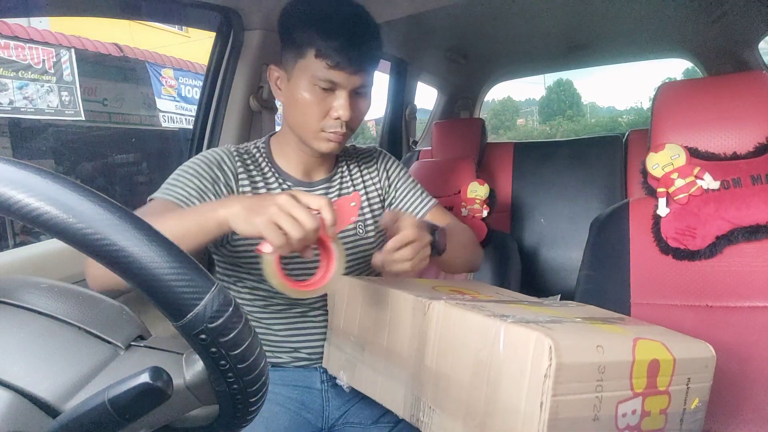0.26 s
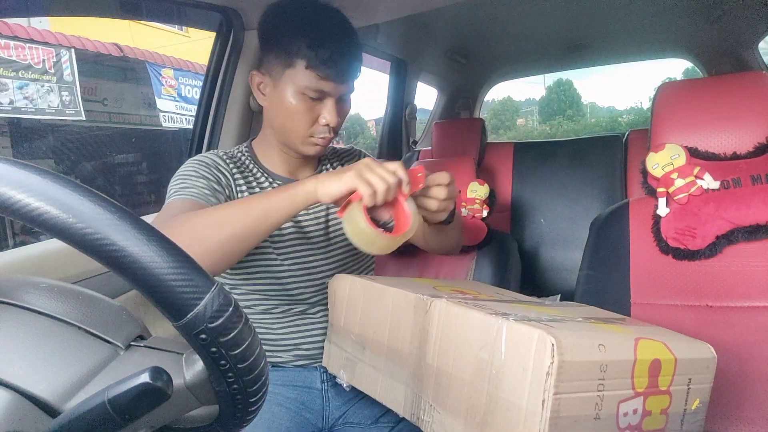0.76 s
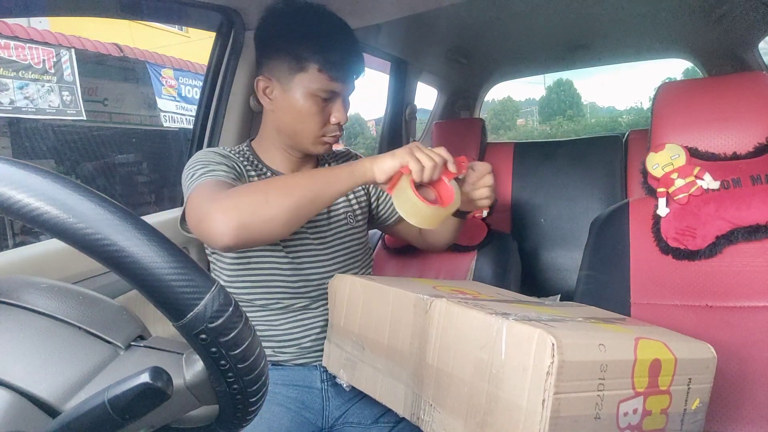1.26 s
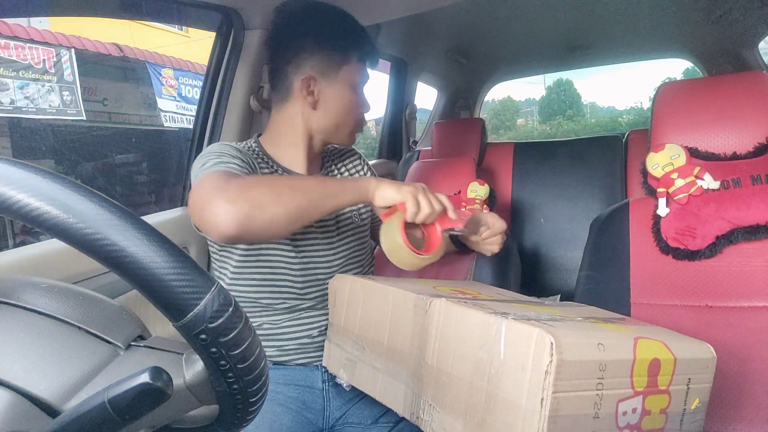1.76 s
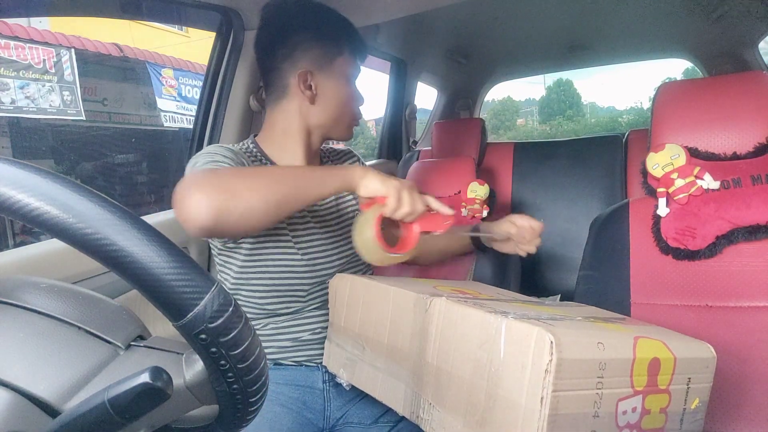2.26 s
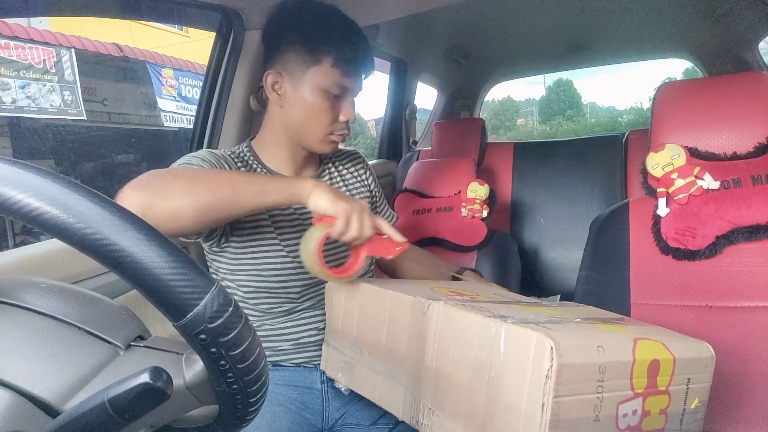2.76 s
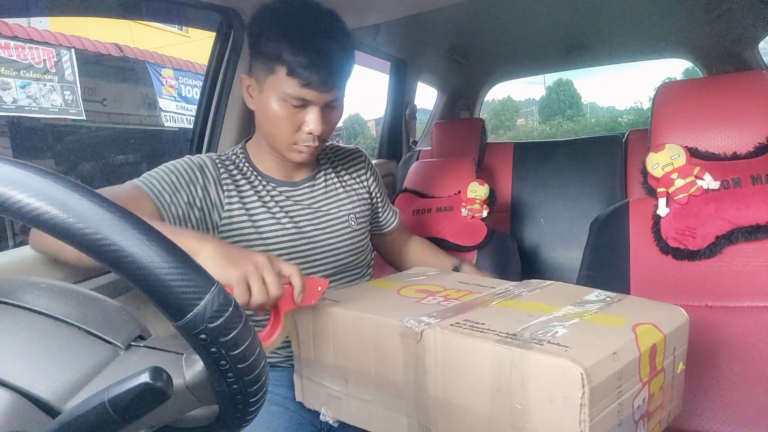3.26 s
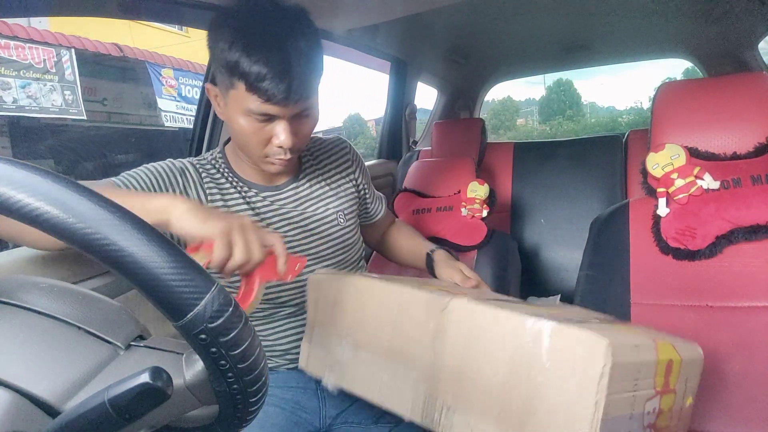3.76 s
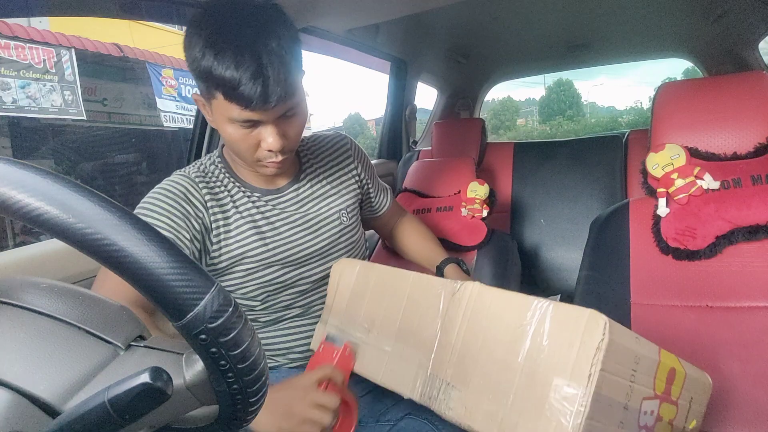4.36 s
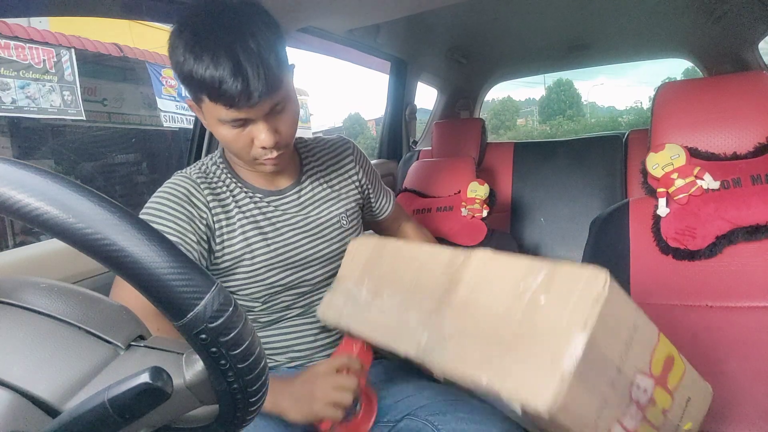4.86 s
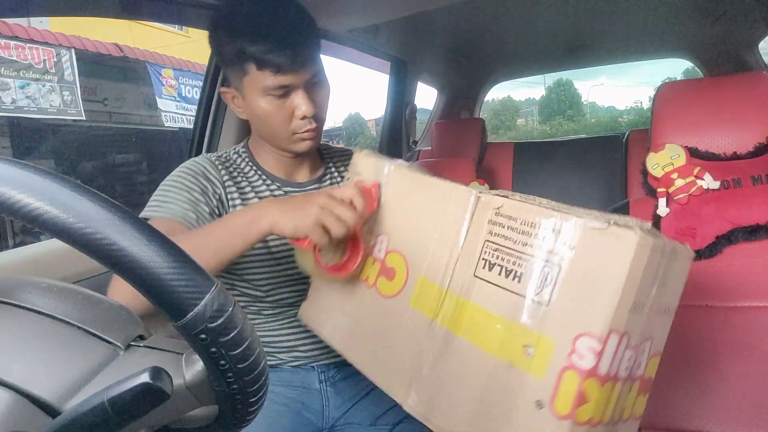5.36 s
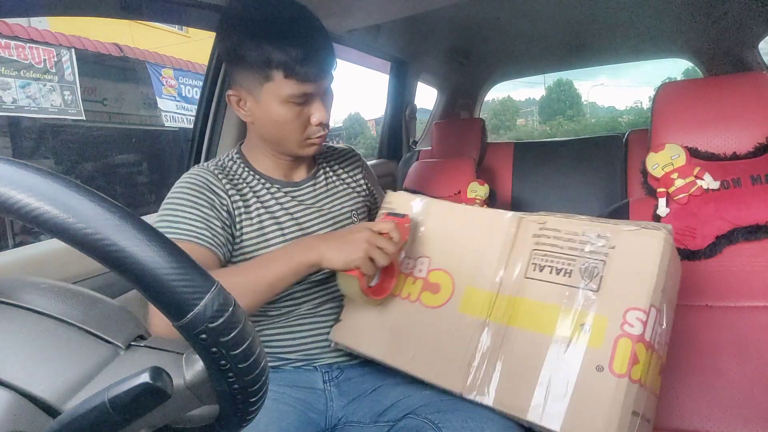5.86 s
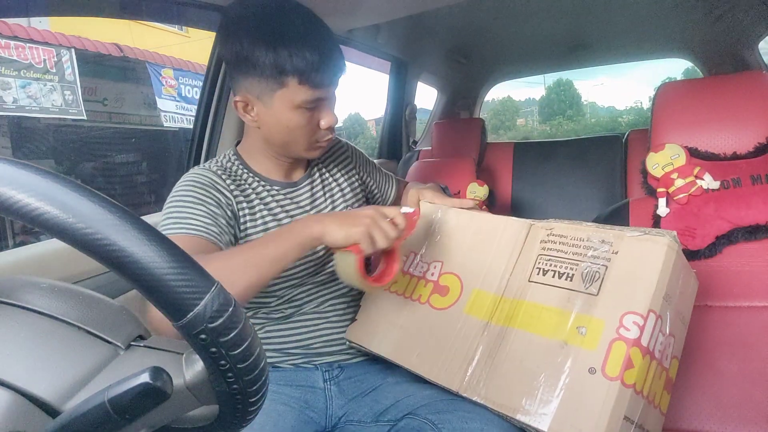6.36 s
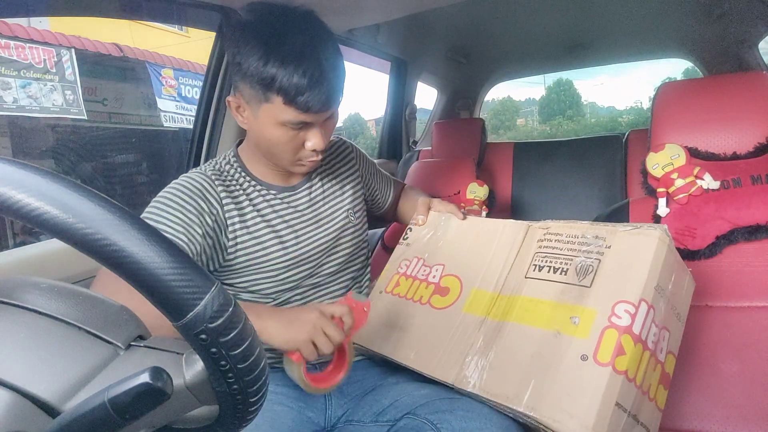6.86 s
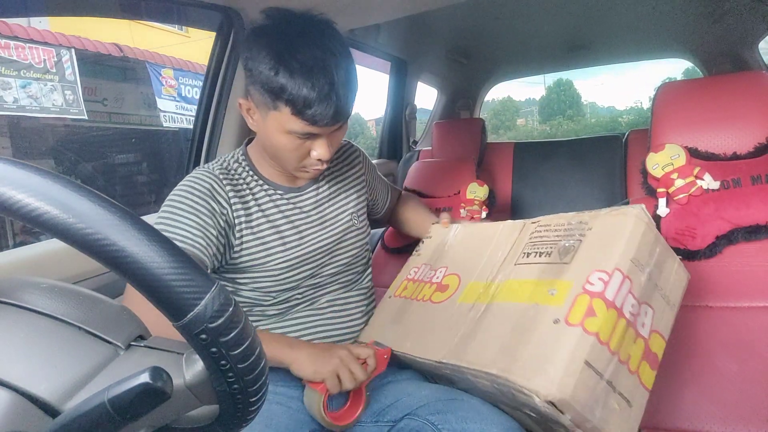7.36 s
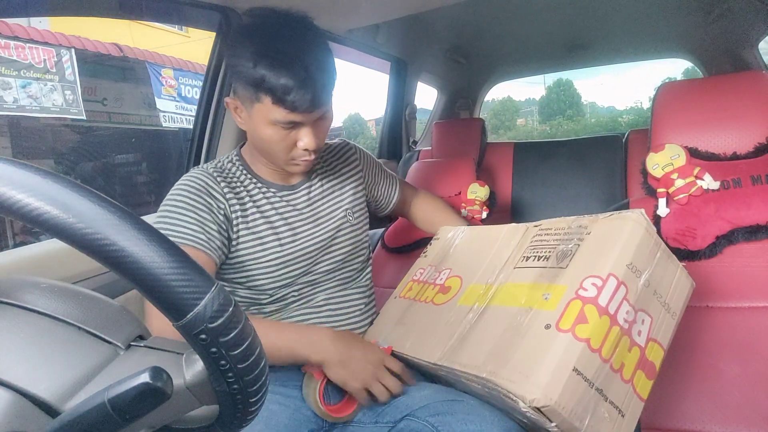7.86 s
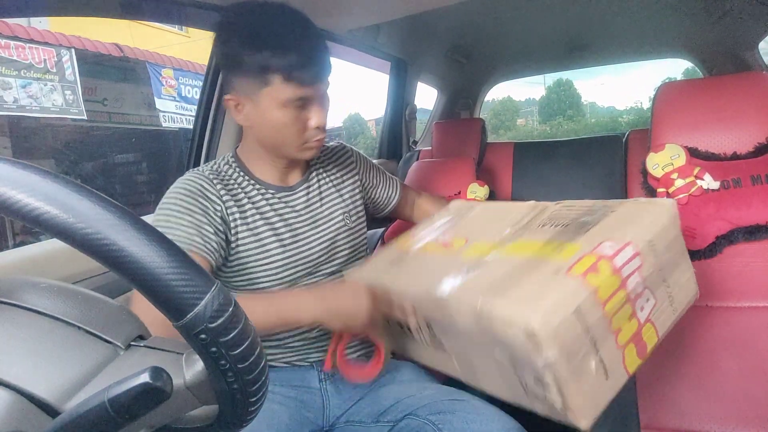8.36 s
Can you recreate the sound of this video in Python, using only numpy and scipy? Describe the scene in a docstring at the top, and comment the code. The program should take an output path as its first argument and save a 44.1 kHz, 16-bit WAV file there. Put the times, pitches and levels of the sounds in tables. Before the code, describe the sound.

Dry, harsh tape peels come in irregular bursts: rapid snaps first, then tearing rips of a fraction of a second, then choppy crackles and another run of rips. Cardboard scuffs and dull box thumps fill the gaps. Late on there is a calmer stretch of rustling before final clicks and a handling swell. Stereo microphones sit nearby in a closed parked van, with tight short echoes and a muffled throbbing engine outside.

```python
"""Inside a parked van with shut doors, a spaced pair of microphones hears packing tape pulled off a dispenser.
The glue lets go in single jerks and long rips: noise bursts, hiss and narrow bands for taut tape and drum.
Close by, hands, tape and cardboard rustle as swelling noise, and the resonant box knocks.
Outside, engine tones throb over filtered traffic noise; this low background dips at set moments, mostly
under a rip. The small padded cabin smears the tape sounds with short echoes, different at each microphone."""
import sys
import numpy as np
from scipy import signal
from scipy.fft import rfft, irfft, next_fast_len
from scipy.io import wavfile
from scipy.ndimage import map_coordinates

SR = 44100
rng = np.random.default_rng(int(sys.argv[2]) if len(sys.argv) > 2 else 0)


def generate_wav(sig):
    """Save sig (samples, or channels by samples) to the path in sys.argv[1] as 16-bit PCM at SR."""
    pcm = np.round(np.clip(np.atleast_2d(sig).T, -1, 1) * 32767).astype(np.int16)
    wavfile.write(sys.argv[1], SR, pcm)


N = 380141

# Outside the van. Engine: time_s, firing_rate_hz, first_order_db, second_order_db (re traffic level)
ENGINE_ORDERS = [ (0, 27.4, -1, 4), (.5, 27.4, 0, 4), (1.05, 28.7, -2, 3), (1.3, 28.8, -8, -6),
                 (1.75, 30.4, -16, -7.5), (2.1, 31.8, -9, -19), (2.5, 34, -9, -23), (2.85, 32.3, -9.5, -24),
                 (3.2, 29.36, 1, -6), (3.5, 27.54, -8, -16), (3.85, 24.75, -6.5, -19), (7.2, 24.5, -8, -25),
                 (7.55, 23.7, -7, -0.5), (7.95, 24, 1, -8), (8.15, 25, -5, -22), (8.35, 25.23, 4.5, -22),
                 (8.62, 24.5, -3.5, 3.5)]
# A rising hum: time_s, pitch_hz, level_db (re traffic level)
RISING_HUM = [(.15, 128.2, -18), (.3, 128.7, -4.5), (.7, 136, -7), (1.05, 140.8, -2), (1.4, 140.8, -10),
              (1.76, 149.3, -4)]
# Faint hums: pitch_hz, level_db (re traffic level)
FAINT_HUMS = [(146, -16), (182, -13), (217, -17)]
# Spectrum of the traffic rumble: frequency_hz, relative_db_per_hz
RUMBLE_SPECTRUM = [(24, -27), (40, -3.5), (114, -7.5), (180, -3.5), (423, -21.5), (461, -19), (503, -22.5),
                   (807, -34.5), (880, -26.5), (1120, -37.5), (1390, -30.5), (1680, -34), (1800, -40.5),
                   (2600, -42.5), (3380, -54), (5720, -120)]
# Traffic level before the dips: time_s, level_db
TRAFFIC_LEVEL = [(0, -35), (2.2, -35.5), (3.0, -36.5), (3.2, -34), (4.6, -34), (5.4, -35), (6, -35),
                 (6.9, -37.5), (7.9, -36), (8.62, -34.5)]
# Dips of the low background: start_s, length_s, depth_db
BACKGROUND_DIPS = [(1.12, .04, 13), (1.2, .2, 4), (1.42, .05, 9), (1.8, .22, 16), (3.47, .12, 5),
                   (3.88, .06, 5), (4.06, .15, 10), (4.94, .02, 15), (5.16, .02, 6), (5.47, .01, 6),
                   (5.6, .3, 7), (6.045, .05, 22), (6.1, .17, 15), (6.31, .13, 23), (6.44, .14, 12),
                   (6.7, .09, 11), (8.17, .12, 6)]
DIP_SINK_S, DIP_RETURN_S = .04, .09

# Strokes of hands on tape and box: peak_s, peak_db, swell_s, fade_s (both times for 20 dB)
RUSTLE_STROKES = [(0, -52, .03, .045), (.3, -62, .6, .9), (.62, -51, .12, .2), (.745, -47, .03, .08),
                  (.9, -56, .1, .1), (.96, -31.5, .035, .1), (1.07, -41, .1, .03), (1.318, -36, .25, .02),
                  (1.37, -38, .1, .03), (1.57, -40, .02, .1), (1.6, -40, .05, .03), (1.72, -38, .03, .06),
                  (2.15, -49, .06, .1), (2.24, -51, .2, .12), (2.37, -42.5, .025, .25), (2.7, -42, .05, .2),
                  (2.94, -51, .9, .04), (3.3, -39, .13, .03), (3.7, -46, .1, .3), (3.8, -35, .15, .1),
                  (3.86, -33, .05, .05), (4.03, -34.5, .07, .03), (4.32, -46, .1, .2), (4.38, -42, .08, .1),
                  (4.6, -40, .3, .3), (4.7, -34, .3, .55), (5.06, -36, .05, .05), (5.3, -41, .11, .05),
                  (5.43, -34, .13, .03), (5.645, -37, .03, .015), (5.685, -40, .015, .02),
                  (5.91, -36.5, .065, .02), (6.02, -34, .15, .03), (6.06, -33, .05, .05),
                  (6.25, -34, .1, .05), (6.63, -44, .3, .03), (7.08, -38, .25, .2), (7.4, -43, .5, .08),
                  (7.76, -49, .9, .1), (7.86, -42.5, .08, .8), (8.08, -37, .12, .05), (8.38, -31, .2, .02),
                  (8.3, -40, .2, .2), (8.48, -30, .09, .25)]
# Spectrum of the rubbing: frequency_hz, relative_db_per_hz
RUB_SPECTRUM = [(1060, -8), (1800, -5), (2310, -5.5), (5280, -4), (8540, 1.5), (11800, -7.5), (15000, -3.5),
                (16000, -4.5), (16500, -35)]

# Single slips and snaps of tape: start_s, level_db, middle_lift_db (tones below about 2.6 kHz)
TAPE_JERKS = [(0.1246, -38.5, -36), (0.179, -15, -14), (0.5452, -37, 2), (0.6409, -30, -11),
              (1.039, -18, -8), (1.0899, -7, -13), (1.1573, -11, -16), (1.1967, -8.5, -2.5),
              (1.2311, -8.5, -2), (1.3239, -6, -1), (1.3848, -7, -4.5), (1.4192, -9, -15), (1.44, -13, -10),
              (1.6761, -17.5, -14), (1.7, -14.5, -8.5), (1.7554, -15.5, -6.5), (1.7694, -7.5, 1),
              (2.1385, -33, -8), (2.165, -34, -16), (2.4588, -9.5, 0), (2.5017, -11, 0), (2.6584, -19, -11),
              (2.7242, -23, -5), (2.9467, -33.5, -7), (3.1901, -19.5, -27), (3.262, -30.5, -20),
              (3.3084, -7, -4.5), (3.8352, -5.5, -1), (3.8726, -7.5, -2.5), (3.8901, -11, -1.5),
              (4.0402, -7.5, -30), (4.0544, -13.5, -7.5), (4.3665, -27, -20), (4.3859, -31.5, 13),
              (4.4194, -32.5, -14), (4.7671, -24, -5), (4.8519, -10.5, -18), (4.8928, -11, -22),
              (4.9142, -10, -30), (4.951, -19, -20), (4.9751, -18.5, -13), (5.0754, -22, 4.5),
              (5.093, -17, -10), (5.1193, -11, -20), (5.178, -19, -12), (5.192, -25, -12),
              (5.3044, -19, -11), (5.3148, -7, -10.5), (5.3383, -9.5, -4.5), (5.4415, -9, -12),
              (5.4595, -10, -7.5), (5.511, -15, -5), (5.531, -11, 1), (5.5593, -10.5, 0),
              (5.6111, -7.5, -27), (5.692, -15, -11), (5.7254, -8.5, -29), (5.738, -12, -15),
              (5.7558, -12, 0), (5.8661, -31, -9), (5.9229, -10.5, 1.5), (5.9369, -10, -9),
              (5.9514, -11.5, 1.5), (6.0367, -14, 2), (6.0761, -17, 1), (6.1833, -16, -1),
              (6.1974, -17, 3.5), (6.2617, -8, 3), (6.2976, -16.5, -4), (6.536, -10.5, -12),
              (6.6388, -8, -2), (6.6554, -17.5, -10), (7.7872, -13, -2), (7.8044, -14, -9),
              (7.8745, -28, -30), (8.0262, -25.5, -11), (8.0885, -9, -3), (8.1244, -7, -5.5),
              (8.1853, -10.5, -7), (8.1994, -11, -7.5), (8.2591, -18.5, 2), (8.3784, -26.5, -6),
              (8.5475, -34, 6)]
# Spectrum of a jerk: frequency_hz, relative_db_per_hz
SNAP_SPECTRUM = [(350, -6), (600, -14), (1420, -5), (2090, 0), (2680, -5), (3790, -4.5), (4800, -6.5),
                 (7590, -1), (12200, -11), (15200, -9.5), (16500, -13)]
JERK_T60_S = .026

# Stretches of steady pull: start_s, length_s, first_level_db, last_level_db, first_pitch_hz, last_pitch_hz
# (of the taut tape), then ring_db, upper_drumming_db, lower_drumming_db (re the pull's level)
STEADY_PULLS = [(1.092, .046, -23, -16, 1950, 2090, -10, -32, -18),
                (1.14, .03, -23, -24, 2090, 2100, -6, -20, -32),
                (1.42, .045, -19.5, -20, 1970, 1900, -14, -23, -30),
                (1.75, .025, -19, -16, 1880, 1880, -7, -33, -24),
                (1.79, .295, -16, -18, 1930, 1880, -11, -25, -22),
                (2.459, .026, -19, -18, 1940, 1900, -21, -14, -19),
                (2.502, .138, -17, -18, 1930, 1820, -14, -15, -20),
                (2.64, .045, -24.5, -30, 1940, 1940, -15, -22, -26),
                (3.309, .131, -17, -16.5, 1800, 2000, -19, -18, -23),
                (3.44, .09, -18, -17, 2150, 1600, -7.5, -18, -26),
                (4.045, .125, -24, -16.5, 2150, 2050, -16, -11, -21),
                (4.17, .052, -17, -17, 1600, 1800, -12, -10, -26),
                (4.85, .14, -28.5, -37, 2060, 2010, -17, -27, -25),
                (5.07, .045, -34, -27, 2000, 2040, -8, -20, -16),
                (5.115, .04, -20, -18, 2040, 2080, -12, -22, -15),
                (5.44, .045, -31, -21, 2090, 2180, -9, -21, -16),
                (5.512, .115, -22, -25, 2080, 2170, -8, -19, -21),
                (5.69, .08, -26.5, -26.5, 2090, 2140, -14, -23, -19),
                (5.93, .03, -40, -33, 1960, 1930, 3, -23, -16),
                (6.076, .05, -28, -23, 2020, 2050, -4, -27, -27),
                (6.126, .085, -20, -19, 2050, 2080, -4.5, -30, -30),
                (6.298, .092, -23.5, -21.5, 2040, 1960, -8.5, -31, -27),
                (6.39, .05, -18, -15, 2020, 2070, -9, -28, -30),
                (6.44, .1, -16, -19, 2070, 2130, -12, -24, -28),
                (6.639, .155, -17, -20, 2180, 2130, -9, -15, -24),
                (8.126, .016, -15.5, -25, 2110, 2110, -8, -25, -20)]
# Spectrum of the peeling hiss: frequency_hz, relative_db_per_hz
PEEL_SPECTRUM = [(710, -21.5), (1200, -15.5), (1630, -8.5), (1880, -9.5), (2730, -3.5), (3750, -2.5),
                 (5100, -4.5), (6080, -1.5), (8550, 0), (11700, -8), (15300, -8), (16000, -10),
                 (16500, -42)]
# Resonances of the tape film colour that hiss: centre_hz, width_hz, lift_db
FILM_LIFTS = [(3020, 170, 2.5), (3780, 430, 1.5), (4250, 160, 2.5), (6250, 140, 0.5), (7300, 330, -1)]
# The roll and its holder drum at two pitches: upper_hz, lower_hz
DRUM_PITCHES = (963, 483)
RIP_DIES_DB_PER_S, RIP_TAIL_S = 1000, .04  # when the pull stops
TAPE_WANDER_HZ, RING_WANDER_DB = 40, 1.5  # the tension is never steady

# Blows on the box: time_s, peak_db
BOX_KNOCKS = [(3.189, -29), (4.384, -27), (4.751, -24), (5.016, -34), (5.04, -34), (5.097, -12.5),
              (5.139, -20), (5.327, -21.5), (5.985, -24), (8.124, -16), (8.485, -24)]
# Resonances of its cardboard walls: centre_hz, width_hz, relative_db
BOX_MODES = [(160, 52, -0.5), (408, 127, -5.5), (520, 48, -6.5), (930, 160, -16.5)]

# Decay of the cabin's echoes: frequency_hz, t60_s
CABIN_DECAY = [(300, 0.095), (2000, .085), (6000, 0.1), (15000, 0.069)]
# Where the hands work: time_s, left_minus_right_db
HAND_POSITION = [(0, -4), (.15, 0), (2.45, 0), (2.62, 2.5), (3.12, -3), (3.55, 2.5), (4.08, -2.5),
                 (4.25, 0), (6.7, .5), (6.79, 4), (6.96, -.5), (8.62, -.5)]
# Microphone pair: frequency_hz, left_right_likeness (1 = the same)
PAIR_LIKENESS = [(40, 0.96), (90, 0.95), (180, 0.95), (350, 0.58), (700, 0.34), (1400, 0.16), (2800, 0.26),
                 (5600, 0.024)]
# Colour of the two microphone ports: frequency_hz, left_minus_right_db
PORT_BALANCE = [(700, -0.5), (2800, -1.5), (5600, -2.6), (9500, 2.5), (14000, -2)]
# The microphones' own noise: frequency_hz, relative_db_per_hz
MIC_NOISE_SPECTRUM = [(1500, -12), (3000, 6), (8000, -5), (11000, -15), (16000, -4)]
TOP_HZ = 15900  # nothing sounds above this frequency


def amp(db):
    """Decibels to amplitude factor."""
    return 10 ** (np.asarray(db) / 20)


def unit(x):
    """x scaled to rms 1."""
    return x / np.sqrt(np.mean(x ** 2) + 1e-20)


def along(points, hz):
    """(Hz, value) points joined by lines on a log frequency axis."""
    f, v = np.transpose(points)
    return np.interp(np.log(hz + 1), np.log(f + 1), v)


def curves(rows):
    """One value per sample for each column after the time."""
    s, *cols = np.transpose(rows)
    return [np.interp(np.arange(N) / SR, s, c) for c in cols]


def slowly(shape):
    """A control worked out every millisecond and joined by lines."""
    t = np.arange(0, N / SR + .01, .001)
    return np.interp(np.arange(N) / SR, t, shape(t))


def wobble(rate):
    """A smooth random curve, rate knots a second."""
    knots = rng.standard_normal(int(N * rate / SR) + 4)
    return map_coordinates(knots, [np.arange(N) * rate / SR])


def filtered(x, response):
    """x passed through a complex response of frequency."""
    m = next_fast_len(x.shape[-1] + 8192)
    spectrum = rfft(x, m) * response(np.fft.rfftfreq(m, 1 / SR))
    return irfft(spectrum, m)[..., :x.shape[-1]]


def coloured(x, spectrum):
    """x filtered by a table of (Hz, dB)."""
    return filtered(x, lambda hz: amp(along(spectrum, hz)))


def tone(hz, db):
    """A slightly uneven sine of rms level around db."""
    phase = 2 * np.pi * np.cumsum(hz) / SR + 0.13 * wobble(7.1)
    return amp(db + .7 * wobble(12)) * np.sqrt(2) * np.cos(phase)


def band(hz, width_hz):
    """Narrow noise of rms 1 carried on a moving pitch."""
    lowpass = lambda f: 1 / (1 + (2 * f / width_hz) ** 2)
    slow = filtered(rng.standard_normal((2, len(hz))), lowpass)
    phase = 2 * np.pi * np.cumsum(hz) / SR
    return unit(slow[0] * np.cos(phase) + slow[1] * np.sin(phase))


def crackle(spread_db, count=N):
    """Tiny slips of glue, one a sample, a few bigger than the rest."""
    size = np.minimum(rng.exponential(size=count), 5)
    return unit(rng.standard_normal(count) * amp(spread_db * size))


def modes(table):
    """Causal sum of (Hz, width, dB) resonances with alternating signs."""
    def response(f):
        total = 0
        for k, (centre, width, db) in enumerate(table):
            resonance = 1j * f * width / (centre * centre - f * f + 1j * f * width)
            total = total + (-1) ** k * amp(db) * resonance
        return total
    return response


def alike(pair):
    """Two unrelated sounds become one in the bass, where the wave is longer than the microphone spacing."""
    def weights(hz):
        turn = np.arccos(np.clip(along(PAIR_LIKENESS, hz), 0, 1)) / 2
        return np.array([np.cos(turn), np.sin(turn)])
    both = np.array([pair[0] + pair[1], pair[0] - pair[1]]) / np.sqrt(2)
    mid, side = filtered(both, weights)
    return np.array([mid + side, mid - side])


def engine():
    """Low firing orders follow the firing rate; a rising hum and some faint hums come and go."""
    hz, first_db, second_db = curves(ENGINE_ORDERS)
    t = np.arange(N) / SR
    hum_sounds = (t > RISING_HUM[0][0]) * (t < RISING_HUM[-1][0])
    rising = tone(*curves(RISING_HUM)) * hum_sounds
    faint = sum(tone(f + .8 * wobble(1.5), db + 3 * wobble(1.2)) for f, db in FAINT_HUMS)
    return tone(hz, first_db) + tone(2 * hz, second_db) + rising + faint


def traffic():
    """Rumble and engine through the shut doors, sinking together in each dip; the rumble throbs with each firing."""
    def dip(t, start, length, depth_db):
        corners = start + np.cumsum([-DIP_SINK_S, DIP_SINK_S, length, DIP_RETURN_S])
        return np.interp(t, corners, [0, depth_db, depth_db, 0])
    dip_db = slowly(lambda t: np.max([dip(t, *row) for row in BACKGROUND_DIPS], axis=0))
    firing_hz = curves(ENGINE_ORDERS)[0]
    throb = 1 + 0.14 * np.cos(2 * np.pi * np.cumsum(firing_hz) / SR)
    road = unit(alike(coloured(rng.standard_normal((2, N)), RUMBLE_SPECTRUM)))
    rumble = throb * amp(1.0 * wobble(14)) * road
    return amp(curves(TRAFFIC_LEVEL)[0] - dip_db) * (rumble + engine())


def hiss_floor(db=-62):
    """The microphones' faint smooth noise, unrelated in the two channels."""
    response = lambda hz: amp(along(MIC_NOISE_SPECTRUM, hz)) * (hz > 800)
    return amp(db) * unit(filtered(rng.standard_normal((2, N)), response))


def rustle():
    """Skin and film rub on cardboard in uneven grains; each stroke swells and fades."""
    def loudest_stroke(t):
        strokes = [peak_db - 20 * np.maximum((s - t) / swell, (t - s) / fade)
                   for s, peak_db, swell, fade in RUSTLE_STROKES]
        return np.max(strokes, axis=0)
    uneven_db = .8 * wobble(25) + 1.5 * wobble(120)
    rubbing = unit(coloured(crackle(spread_db=3.0), RUB_SPECTRUM))
    return amp(slowly(loudest_stroke) + uneven_db) * rubbing


def jerks():
    """Each jerk frees a few millimetres of tape in a burst of milliseconds."""
    out, t = np.zeros(N + SR), np.arange(2048) / SR
    fade = amp(-60 * t / JERK_T60_S)
    for s, db, middle_db in TAPE_JERKS:
        burst = crackle(spread_db=2.0, count=len(t)) * fade

        def colour(hz):
            middle_lift_db = middle_db / (1 + (hz / 2600) ** 4)
            bass_cut = hz ** 2 / (hz ** 2 + 420 ** 2)
            return amp(along(SNAP_SPECTRUM, hz) + middle_lift_db) * bass_cut
        # level of the burst as it opens, before the lift and the bass cut
        opening_rms = np.linalg.norm(coloured(burst, SNAP_SPECTRUM)) / np.linalg.norm(fade)
        out[round(s * SR):][:len(t)] += amp(db) * filtered(burst, colour) / opening_rms
    return out[:N]


def rips():
    """A stream of slips: its hiss, and apart from it the ring of the taut tape and the drumming; the pull judders."""
    hiss, rings = np.zeros((2, N + SR))

    def film(hz):
        lift_db = sum(db / (1 + (2 * (hz - c) / w) ** 2) for c, w, db in FILM_LIFTS)
        return amp(along(PEEL_SPECTRUM, hz) + lift_db)
    drift_hz, drift_db = TAPE_WANDER_HZ * wobble(14), RING_WANDER_DB * wobble(20)
    for s, length, first_db, last_db, first_hz, last_hz, ring_db, upper_db, lower_db in STEADY_PULLS:
        t = np.arange(0, length + RIP_TAIL_S, 1 / SR)
        here = slice(round(s * SR), round(s * SR) + len(t))
        pull_db = np.interp(t, [0, length], [first_db, last_db])
        level = amp(pull_db - RIP_DIES_DB_PER_S * np.maximum(t - length, 0))
        tape_hz = np.interp(t, [0, length], [first_hz, last_hz])
        slips = unit(filtered(crackle(spread_db=2.0, count=len(t)), film))
        ring = amp(ring_db + drift_db[here]) * band(tape_hz + drift_hz[here], width_hz=370)
        upper = amp(upper_db) * band(np.full(len(t), DRUM_PITCHES[0]), width_hz=380)
        lower = amp(lower_db) * band(np.full(len(t), DRUM_PITCHES[1]), width_hz=150)
        hiss[here] += level * slips
        rings[here] += level * (ring + upper + lower)
    judder = amp(0.5 * wobble(55) + 1.8 * wobble(240))
    return hiss[:N] * judder, rings[:N] * judder


def knocks():
    """Soft blows ring the hollow box: impulses through its wall resonances and a gentle treble cut."""
    blows = np.zeros(N)
    for s, db in BOX_KNOCKS:
        blows[round(s * SR)] = amp(db)
    box = lambda hz: modes(BOX_MODES)(hz) / (1 + 1j * hz / 900)
    single_peak = np.abs(filtered(signal.unit_impulse(2048), box)).max()
    return filtered(blows, box) / single_peak


def cabin(x, size, early_db=8, early_s=0.014):
    """Dense short echoes, strongest at first; each piece of size samples gets one of 128 echo tails at random."""
    count = -(-N // size)
    hz, t, z = signal.stft(rng.standard_normal((2, 128, 3072)), SR, nperseg=128)
    decay = amp(-60 * t / along(CABIN_DECAY, hz)[:, None])
    early = 1 + amp(early_db - 60 * t / early_s)
    tails = signal.istft(z * decay * early, SR, nperseg=128)[1]
    tails /= np.linalg.norm(tails, axis=2, keepdims=True)
    pieces = np.pad(x, (0, count * size - N)).reshape(1, count, size)
    choice = rng.integers(tails.shape[1], size=count)
    wet = signal.fftconvolve(pieces, tails[:, choice], axes=2)
    # lay the overlapping pieces back in time and add them up
    where = np.arange(count)[:, None] * size + np.arange(wet.shape[2])
    return np.array([np.bincount(where.ravel(), w.ravel())[:N] for w in wet])


def scene():
    """Tape and hands in the cabin, panned with the hands, over knocks, traffic and microphone noise."""
    background = traffic() + hiss_floor()
    small = rustle() + jerks()
    hiss, rings = rips()
    small = small + hiss
    # short pieces smear hiss, jerks and rustle; long pieces keep the ring and drumming narrow,
    # with a share of the hiss, jerks and rustle
    tape = cabin(.75 * small, size=192) + cabin(.66 * small + rings, size=4096)
    pan_db, = curves(HAND_POSITION)
    return alike(tape) * amp([pan_db / 2, -pan_db / 2]) + knocks() + background


def record(dry):
    """The two ports differ in colour; peaks are rounded off softly; nothing sounds above TOP_HZ."""
    ports = filtered(dry, lambda hz: amp(np.outer([.5, -.5], along(PORT_BALANCE, hz))))
    soft = ports / (1 + np.abs(ports / .75) ** 4) ** (1 / 4)
    offset = soft + .002  # a small constant offset
    return filtered(offset, lambda hz: hz < TOP_HZ)


dry = scene()
out = record(dry)
generate_wav(out)
```